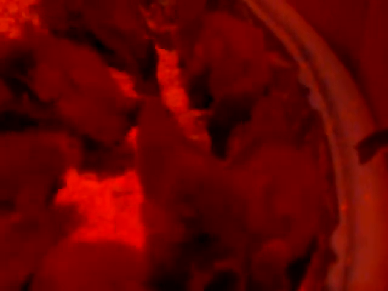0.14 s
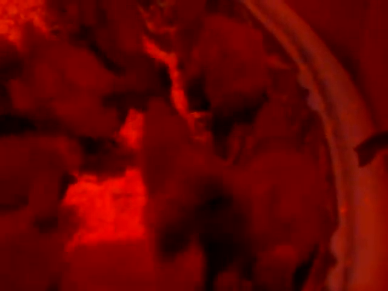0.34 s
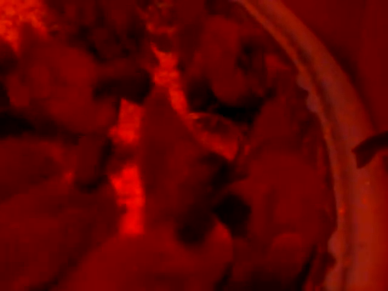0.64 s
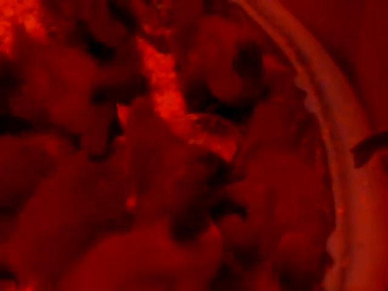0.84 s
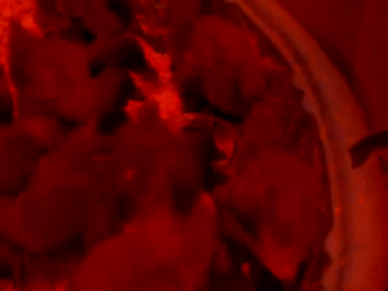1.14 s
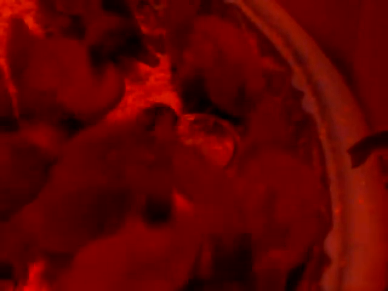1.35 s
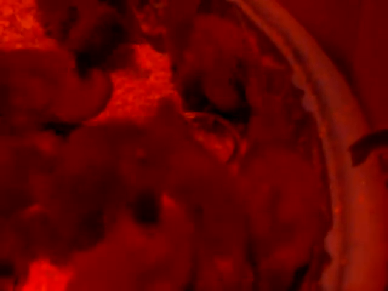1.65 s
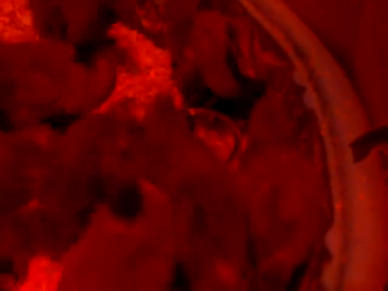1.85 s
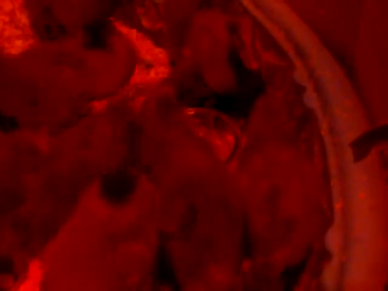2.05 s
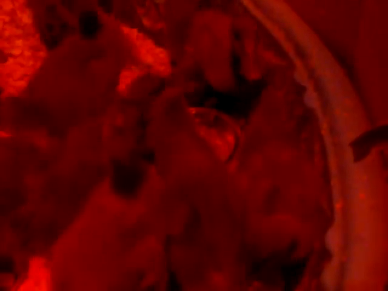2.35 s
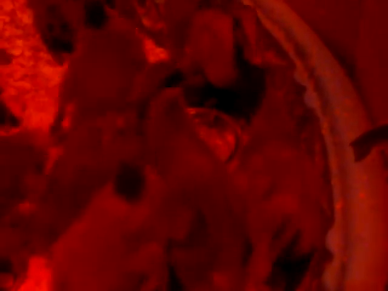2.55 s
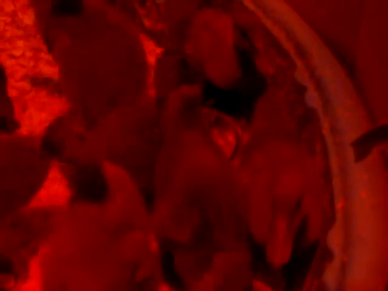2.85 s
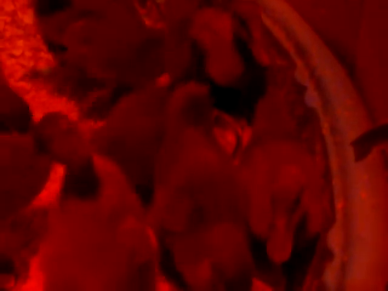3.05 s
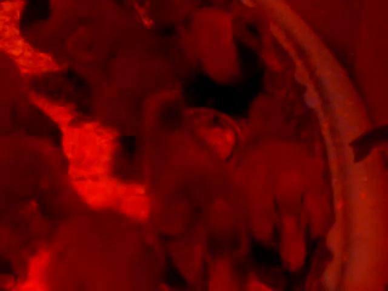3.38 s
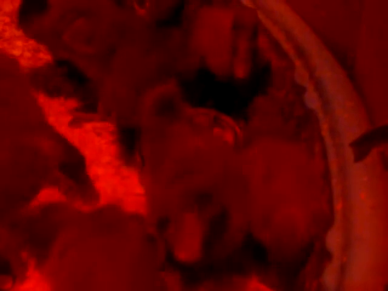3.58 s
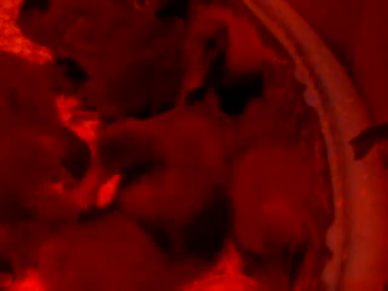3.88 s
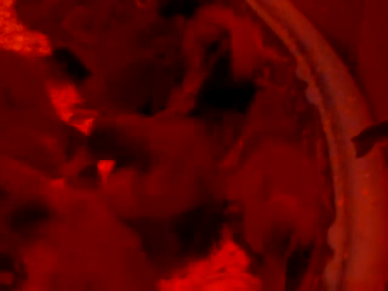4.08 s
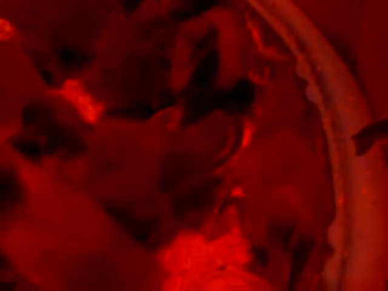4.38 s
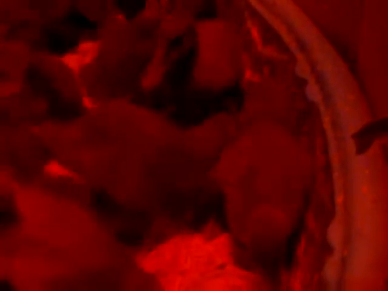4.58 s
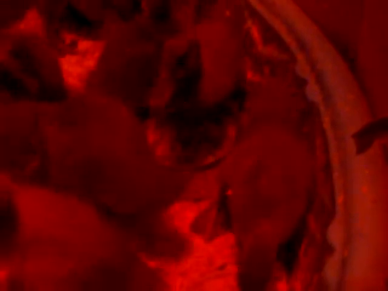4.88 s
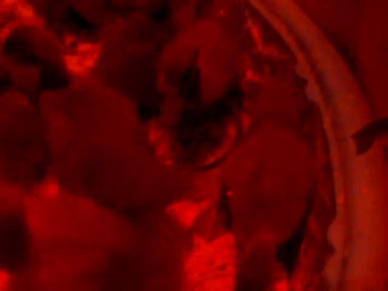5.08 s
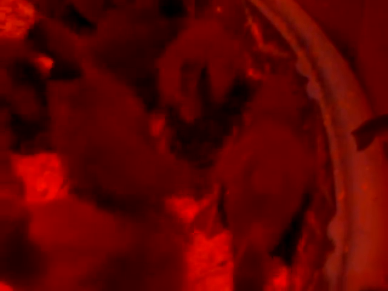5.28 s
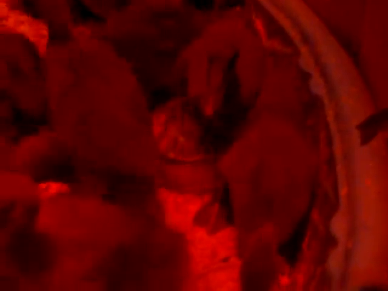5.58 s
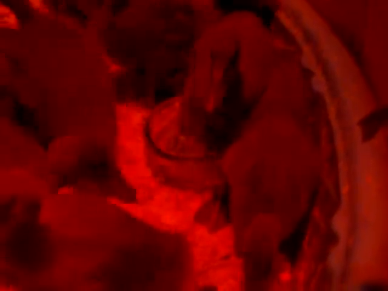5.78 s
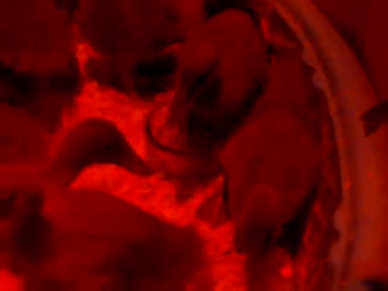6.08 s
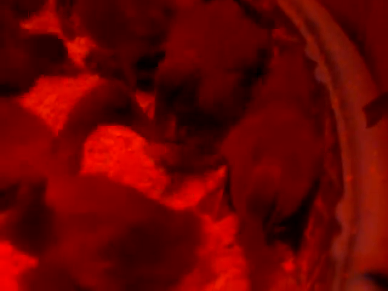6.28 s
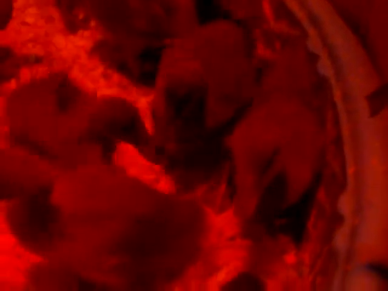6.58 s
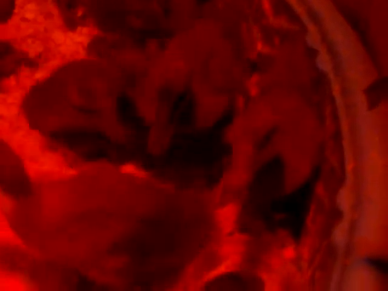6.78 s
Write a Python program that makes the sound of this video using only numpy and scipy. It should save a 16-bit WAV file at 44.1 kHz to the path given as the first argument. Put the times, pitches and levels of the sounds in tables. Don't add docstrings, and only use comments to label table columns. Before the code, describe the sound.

Ducklings feed in a plastic tub indoors, heard very close with short boxy echoes. From 0 to 0.9 seconds, bills snap and crunch quickly over rustling dry bedding and low floor pecks, with a strong wall bump near 0.6. The first peep comes at about 0.9. From 1 to 2.8, crisp clicks, rim clacks, husk cracks and hollow pecking continue, with several short peeps around 1.6 to 2.7, two doubled by thin squeaks. A glass dish pings softly around 2.7 to 3.2. From 3 to 4.5 it is sparser: isolated snaps, scrapes and dull bumps. Brief peeps return from 4.6 to 6.1, while hollow body knocks gather from 5.3 onward. At 6.3 a louder warble leaps up, flips and fades alongside a low dish note, then feet scuffle to the end. Soft low shuffling, airy hiss, faint hum and a barely audible high whine lie beneath.

```python
import sys
import numpy as np
from scipy import signal
from scipy.io import wavfile
from scipy.ndimage import uniform_filter1d

SR = 44100
rng = np.random.default_rng(int(sys.argv[2]) if len(sys.argv) > 2 else 0)


def natural_amplitude(level_db):
    exponent = np.asarray(level_db, float) / 20
    return 10 ** exponent


def transcribe(signal):
    frames = np.atleast_2d(signal).T
    limited = np.clip(frames, -1, 1)
    pcm = np.round(limited * 32767).astype(np.int16)
    wavfile.write(sys.argv[1], SR, pcm)


N = 305613


def evened(x):
    return x / np.sqrt(np.mean(x ** 2) + 1e-20)


def peaked(x):
    return x / (abs(x).max() + 1e-20)


def add(mix, start_s, sound):
    part = mix[round(start_s * SR):][:len(sound)]
    part += sound[:len(part)]


def track(source, events):
    mix = np.zeros(N)
    for start_s, *how in events:
        add(mix, start_s, source(*how))
    return mix


def band(x, lo_hz, hi_hz):
    return signal.sosfilt(signal.butter(2, [lo_hz, min(hi_hz, SR / 2.2)], "bandpass", fs=SR, output="sos"), x)


def coloured(spectrum, patchy_db):
    frames, hz = N // 128 + 5, np.fft.rfftfreq(512, 1 / SR)
    real, imag, patches = rng.standard_normal((frames, 257, 3)).T
    patches = evened(uniform_filter1d(uniform_filter1d(patches, 10, 0), 8, 1))
    point_hz, point_db = np.transpose(spectrum)
    shape_db = np.interp(np.log(hz + 1), np.log(point_hz + 1), point_db)[:, None]
    bins = (real + 1j * imag) * natural_amplitude(shape_db + patchy_db * patches)
    return evened(signal.istft(bins, nperseg=512, noverlap=384)[1][:N])


def burst(t, t60, grit_db):
    grit = natural_amplitude(grit_db * evened(uniform_filter1d(rng.standard_normal(len(t)), 30)))
    first = 0.68 * natural_amplitude(-60 * t / 0.0051)
    return rng.standard_normal(len(t)) * (grit + first) * natural_amplitude(-60 * t / t60) * np.minimum(t / .0002, 1)


def arch(start_s, length_s, top_hz, db, loudest, rest_hz):
    climb_s, climb_share, sag = .027, 0.916, 1.05
    swell_db, swell_share, fade_db, fade_s = 13, .8, 14, .012
    strain_hz, strain_db_per_hz, most_strain_db = 2340, 0.4, 13.5
    t = np.arange(0, length_s, .001)
    loudest_s = loudest * length_s
    top_s, late = min(climb_s, climb_share * loudest_s), t - loudest_s
    bend = np.where(t < top_s, t / top_s, 1 + (t - top_s) / (length_s - top_s))
    hz = rest_hz + (top_hz - rest_hz) * abs(np.sin(np.pi / 2 * bend)) ** sag
    width_s = np.where(late < 0, swell_share * loudest_s, fade_s)
    under_db = np.where(late < 0, swell_db, fade_db) * (1 - np.exp(-(late / width_s) ** 2))
    strain_db = np.clip(strain_db_per_hz * (hz - strain_hz), 0, most_strain_db)
    strain_db *= rest_hz < strain_hz
    return np.transpose([start_s + t, hz, db - under_db - strain_db])


def peep(contour):
    throat_hz, throat_width_hz = 3570, 780
    s, hz, db = np.transpose(contour)
    t = np.arange(s[0], s[-1], 1 / SR)
    tremble = [evened(uniform_filter1d(v, 150))[:len(t)] for v in rng.standard_normal((2, 8000))]
    hz = uniform_filter1d(np.interp(t, s, hz), 250) * (1 + 0.0024 * tremble[0])
    wobble_db = 2.2 * tremble[1]
    phase = 2 * np.pi * np.cumsum(hz) / SR
    throat = 1 / (1 + ((2 * hz - throat_hz) / throat_width_hz) ** 2)
    overtone = natural_amplitude(-22) * (throat + .13) * np.sin(2 * phase)
    tone = np.sin(phase) + overtone + natural_amplitude(-44) * np.sin(3 * phase)
    level = natural_amplitude(uniform_filter1d(np.interp(t, s, db), 150) + wobble_db + 5.0)
    return band(level * tone * signal.windows.tukey(len(t), .15), 700, 12000)


def duckling_voices():
    # start_s, length_s, top_hz, level_db, loudest moment (share of length 0-1)
    peeps = [(0.923, 0.056, 2890, -41, .7), (1.629, .052, 1750, -45.5, 0.46),
             (1.807, 0.058, 2285, -37, 0.37), (2.159, 0.063, 1940, -41, 0.46),
             (2.353, 0.053, 2270, -35.5, 0.39), (2.749, 0.067, 2340, -47.5, 0.8),
             (4.607, 0.044, 2093, -35.5, .36), (4.711, .094, 2254, -38, 0.6),
             (5.097, .06, 1955, -39.5, 0.36), (5.332, 0.032, 1977, -34, 0.31),
             (5.688, 0.043, 1960, -36.5, .45), (6.058, 0.067, 2436, -35.5, 0.66)]
    # start_s, length_s, top_hz, level_db, loudest moment (share 0-1)
    squeaks = [
        (1.818, 0.027, 3530, -45.5, 0.2),
        (2.361, 0.033, 3820, -53, 0.46),
    ]
    # time_s, pitch_hz, level_db
    warble = [
        (6.31, 1686, -44),
        (6.325, 1773, -48),
        (6.345, 2770, -31.5),
        (6.36, 2806, -29.5),
        (6.37, 2740, -38),
        (6.381, 2460, -30),
        (6.395, 2810, -41),
        (6.41, 2400, -49),
        (6.445, 2560, -53),
    ]
    contours = [arch(*row, rest_hz=1459) for row in peeps]
    contours += [arch(*row, rest_hz=3150) for row in squeaks] + [warble]
    return track(peep, [(contour[0][0], contour) for contour in contours])


def snap(db, hz, fizz_db, t60):
    t = np.arange(4000) / SR
    swell = np.minimum(t / (1.2 * t60 ** 2), 1)
    crack = burst(t, max(t60, .008), 4.9) * swell
    ring = peaked(band(crack, hz * 0.877, hz * 1.118))
    wide = peaked(band(crack, 1820, 5060))
    fizz = peaked(band(crack, 8960, 12300))
    return natural_amplitude(db) * peaked(ring + 0.93 * wide) + natural_amplitude(fizz_db + 8.5) * fizz


def bills_and_feet():
    # start_s, peak_db, centre_hz, fizz_db
    clicks = [(.1807, -34, 6600, -50), (.3297, -28.5, 3890, -47), (.38, -67, 7180, -47),
              (.4743, -31.5, 6150, -41.5), (.596, -34.5, 3760, -44.5), (.7974, -24, 3870, -64),
              (.8195, -25, 5300, -44), (.858, -27, 6960, -61), (1.196, -31, 6560, -61),
              (1.2266, -28.5, 3360, -45.5), (1.2467, -35, 4270, -50), (1.412, -37.5, 3660, -48),
              (1.8046, -28, 3870, -36), (2.0363, -33, 3900, -55), (2.0929, -34, 4200, -48.5),
              (2.202, -24.5, 4000, -61), (2.3122, -32.5, 5470, -45), (3.2865, -33, 7600, -66),
              (3.4082, -42, 3560, -66), (3.5049, -46, 3660, -69), (4.626, -38, 4400, -58),
              (4.8634, -36.5, 6260, -43), (4.929, -54, 8000, -70), (5.3103, -28, 3000, -64),
              (5.5338, -44, 3920, -65), (5.608, -31.5, 2830, -66), (5.781, -36.5, 6550, -44),
              (6.0105, -38, 3410, -56), (6.8234, -48, 4160, -70)]
    # start_s, peak_db, centre_hz, fizz_db
    crunches = [(.1074, -31, 6630, -41.5), (.4289, -28, 4070, -65), (.532, -35.5, 4100, -62),
                (.7472, -39, 3870, -49), (1.1677, -37, 4000, -49), (1.736, -53, 4270, -72),
                (1.7505, -28.5, 7800, -66), (1.775, -40, 3800, -51), (1.9783, -26.5, 4300, -42.5),
                (2.075, -42, 3900, -55), (2.1798, -29.5, 4330, -42.5), (2.26, -29.5, 3840, -49),
                (2.5215, -33, 4220, -65), (2.6304, -42.5, 4170, -59), (2.6833, -39.5, 4220, -52),
                (2.7916, -36, 4150, -48.5), (3.3527, -27, 3770, -61), (3.5292, -42, 3650, -59),
                (4.074, -42, 3800, -62), (4.112, -46, 3500, -62), (4.1375, -42, 8430, -47),
                (4.264, -43, 5400, -55), (4.3006, -40, 3950, -47), (4.4304, -42, 6000, -49),
                (5.1983, -37.5, 6700, -53), (5.575, -55, 5470, -68), (5.695, -50, 3840, -53),
                (5.9856, -52, 3090, -51), (6.2721, -40.5, 3670, -47)]
    # start_s, peak_db, centre_hz, fizz_db
    scrapes = [(.0962, -41, 4700, -51), (.671, -31, 3980, -44.5), (1.1139, -37.5, 4900, -47),
               (1.6423, -40, 3550, -69), (2.131, -37, 3840, -47.5), (3.7123, -41.5, 3440, -49),
               (5.3118, -41, 3730, -42.5), (5.594, -33, 3260, -46.5), (5.906, -40, 3770, -42),
               (6.56, -37, 4380, -41), (6.6371, -34.5, 5630, -44.5)]
    # start_s, peak_db, centre_hz, fizz_db, t60_s
    faint = [
        (0.692, -41.5, 2470, -68, 0.14),
        (2.6985, -44, 4430, -55, 0.035),
        (2.827, -35, 2070, -49, 0.041),
        (2.8987, -41, 3000, -68, 0.08),
        (3.103, -45, 1850, -54, 0.075),
        (4.685, -44, 1690, -56, 0.046),
        (6.7338, -41, 1790, -48, 0.091),
    ]
    events = list(faint)
    for table, t60 in ((clicks, 0.021), (crunches, 0.034), (scrapes, 0.05)):
        events += [(*row, t60) for row in table]
    return track(snap, events)


def tap(first_db, second_db, second_hz):
    # pitch_hz, t60_s
    dish = [
        (1903, 0.17),
        (4850, 0.071),
        (8820, 0.41),
    ]
    t = np.arange(8000) / SR
    levels_db = (first_db, second_db, second_db - 15)
    shifts = (1, second_hz / dish[1][0], 1)
    return sum(natural_amplitude(db - 60 * t / t60) * np.sin(2 * np.pi * hz * shift * t)
               for db, (hz, t60), shift in zip(levels_db, dish, shifts))


def dish_taps():
    # start_s, first_mode_db, second_mode_db, second_mode_hz
    taps = [
        (0.5397, -47.5, -39.5, 4770),
        (2.6998, -52, -50, 4770),
        (2.792, -42.5, -43.5, 4840),
        (2.9794, -52.5, -75, 4840),
        (3.119, -58, -57, 4800),
        (3.1903, -52, -73, 4840),
        (4.459, -43.5, -49, 4850),
        (5.2804, -58, -69, 4800),
        (6.2953, -40.5, -68, 4720),
        (6.603, -60, -49.5, 4860),
    ]
    return track(tap, taps)


def knock(db, hz, bright_db, t60):
    # pitch_hz, level_db
    tub = [(250, 24), (330, -30.5), (445, -5.5), (600, -4), (850, -3), (1200, -4), (1600, -63)]
    t = np.arange(7000) / SR
    modes_hz = np.geomspace(280, 1600, num=20) * rng.uniform(1.0, 1.05, 20)
    modes_hz[abs(modes_hz - hz).argmin()] = hz
    wall_hz, wall_db = np.transpose(tub)
    struck_db = 6 * np.exp(-(np.log2(modes_hz / hz) / 0.094) ** 2)
    struck_db -= 13 * np.maximum(np.log2(hz / modes_hz), 0)
    modes_db = np.interp(np.log(modes_hz), np.log(wall_hz), wall_db) + struck_db + 2.5 * rng.standard_normal(20)
    modes_t60 = .09 * (500 / modes_hz) ** .9
    ring = natural_amplitude(modes_db) @ (natural_amplitude(-60 * t / modes_t60[:, None]) * np.sin(2 * np.pi * modes_hz[:, None] * t))
    blows = burst(t, max(t60, .015), 5)
    body = band(band(signal.oaconvolve(ring, blows)[:len(t)], 330, 2330), 248, 2340)
    slap = peaked(band(blows, 1080, 2324))
    return natural_amplitude(db) * (peaked(body) + natural_amplitude(bright_db) * slap)


def tub_knocks():
    # start_s, peak_db, strongest_hz,
    # brightness_db
    bumps = [(0.085, -33, 428, 4.5), (.254, -41.5, 644, 1), (0.29, -28, 930, -11), (.311, -33, 467, -15),
             (0.595, -14.5, 759, -9), (1.896, -40, 436, 5), (2.705, -43.5, 425, 4), (3.711, -39.5, 577, -2),
             (4.0, -45, 463, -4), (4.048, -44.5, 470, -4), (4.073, -40.5, 800, -2.5), (4.394, -37, 590, -7),
             (5.199, -39, 507, -9), (5.312, -22, 804, -1.5), (5.333, -19, 455, -20), (5.593, -18, 1160, -9),
             (5.607, -25, 450, -9), (5.711, -35, 460, -17), (5.778, -27, 467, -27),
             (5.866, -21.5, 586, -19), (5.903, -28.5, 565, -17), (5.983, -18.5, 437, -4.5),
             (6.01, -28.5, 409, -9), (6.048, -33.5, 427, -1.5), (6.131, -35, 565, -36),
             (6.17, -24, 494, -14), (6.219, -23, 431, -29), (6.274, -27.5, 425, -20),
             (6.434, -27, 570, -29)]
    # start_s, peak_db, brightness_db
    clacks = [(.674, -35.5, 0), (0.747, -45.5, 13), (0.764, -48, 9), (.797, -50.5, 20.5),
              (1.127, -50.5, 15.5), (1.147, -45, -1), (1.169, -38, 3.5), (1.229, -35.5, 3.5),
              (1.353, -37, 2.5), (1.394, -31.5, 2.5), (1.78, -41.5, 12), (1.976, -45, 6.5),
              (2.028, -54.5, 21), (2.068, -37.5, 4), (2.199, -50.5, 22.5), (2.243, -40, -2),
              (2.472, -47.5, 9.5), (4.861, -49, 12), (5.439, -42, 0), (5.473, -43.5, 6.5),
              (6.199, -34, -24), (6.464, -29, 1.5), (6.558, -43, 5.5)]
    bump_t60, clack_t60, rim_hz = 0.042, 0.088, 1155
    events = [(*row, bump_t60) for row in bumps]
    events += [(s, db, rim_hz, bright_db, clack_t60) for s, db, bright_db in clacks]
    return track(knock, events)


def peck(db, hz):
    t = np.arange(5000) / SR
    pair = np.sin(2 * np.pi * hz * t) + 0.28 * np.sin(2 * np.pi * (hz * 1.12 * t + rng.random()))
    return natural_amplitude(db - 60 * t / 0.1) * np.minimum(t / 0.0011, 1) * pair


def floor_pecks():
    # start_s, peak_db
    pecks = [(0.034, -42), (.088, -60), (0.209, -44), (.281, -48), (0.46, -46), (.565, -45.5), (.731, -42),
             (1.286, -54), (1.344, -47.5), (1.454, -53), (1.587, -41.5), (1.713, -52), (1.785, -43.5),
             (1.838, -46), (1.896, -57), (1.941, -51.5), (2.004, -51), (2.065, -49), (2.121, -56),
             (2.169, -49.5), (2.224, -50.5), (2.284, -51), (2.712, -49)]
    panel_hz, loaded_hz, loaded_from_s = 446.3, 407, 1.65
    return track(peck, [(s, db, panel_hz if s < loaded_from_s else loaded_hz) for s, db in pecks])


def thud(db):
    t = np.arange(8000) / SR
    return natural_amplitude(db) * peaked(band(burst(t, 0.12, 2.5) * np.minimum(t / 0.013, 1), 100, 246))


def step_thuds():
    # start_s, peak_db
    steps = [
        (0.278, -62),
        (3.121, -66),
        (3.712, -60),
        (3.994, -60),
        (4.062, -58),
        (4.388, -56),
        (5.601, -55),
        (6.425, -60),
    ]
    return track(thud, steps)


def husk(db):
    return natural_amplitude(db) * peaked(band(burst(np.arange(2000) / SR, 0.052, 1.3), 6630, 0.925 * 12300))


def husk_cracks():
    # start_s, peak_db
    husks = [(0.0514, -35.5), (0.227, -40), (0.6385, -36), (0.691, -32), (1.286, -40), (1.298, -39),
             (1.3483, -42), (1.4217, -38), (1.6881, -45), (2.235, -33.5), (2.3446, -36), (2.5697, -39),
             (4.863, -44), (6.0433, -39), (6.4776, -36.5), (6.4953, -39), (6.733, -36), (6.749, -48)]
    return track(husk, husks)


def rustle():
    # time_s, level_db
    activity = [
        (0.0, -51.5),
        (0.81, -54),
        (0.98, -53.5),
        (2.31, -53),
        (2.59, -55),
        (4.86, -56),
        (6.31, -51),
        (6.93, -54),
    ]
    # pitch_hz, level_db per Hz
    bedding = [(88, -68), (150, -58), (424, -21), (706, -4.5), (1250, -1.5), (2960, -10.5), (10200, -11),
               (14200, -23.5), (16300, -53)]
    cracks = natural_amplitude(2.0 * np.minimum(rng.exponential(1, N), 3.5)) * (rng.random(N) < 400 / SR)
    puffs = evened(signal.oaconvolve(cracks, natural_amplitude(-60 * np.arange(2000) / SR / 0.1))[:N])
    ticks, colour = cracks * (rng.random(N) < .3), rng.integers(0, 5, N)
    grain = burst(np.arange(600) / SR, .012, 5)
    fine = np.zeros(N)
    for k, hz in enumerate([1180, 1800, 3000, 4300, 6150]):
        ticking = signal.oaconvolve(ticks * (colour == k), grain)[:N]
        fine += band(ticking, hz, 1.8 * hz) / np.sqrt(hz)
    s, db = np.transpose(activity)
    shavings = evened(coloured(bedding, 2.5) * (.2 + puffs))
    return natural_amplitude(np.interp(np.arange(N) / SR, s, db) - 2) * (shavings + natural_amplitude(-4.5) * evened(fine))


def rumble():
    lumps = natural_amplitude(3.5 * evened(uniform_filter1d(rng.standard_normal(N), 3500)))
    return natural_amplitude(-83.5) * lumps * evened(band(rng.standard_normal(N), 74, 370))


def hum():
    # time_s, pitch_hz, level_db
    drift = [
        (0, 107.2, -101),
        (.8, 110, -83),
        (1.0, 116, -81),
        (1.8, 118, -81),
        (2, 100.7, -84),
        (6.93, 100, -94),
    ]
    t, (s, hz, db) = np.arange(N) / SR, np.transpose(drift)
    drone = natural_amplitude(np.interp(t, s, db)) * np.sin(2 * np.pi * np.cumsum(np.interp(t, s, hz)) / SR)
    waver = natural_amplitude(1.5 * evened(uniform_filter1d(rng.standard_normal(N), 6000)))
    return drone + waver * natural_amplitude(-74) * np.sin(2 * np.pi * 248 * t)


def room_air():
    # pitch_hz, level_db per Hz
    air = [(24, -52), (40, -38), (168, -51), (251, -4), (357, 3), (605, 6), (1500, -7), (2800, -9),
           (7290, -31), (7860, -8), (9860, -9.5), (14400, -10.5), (16300, -42)]
    return natural_amplitude(-58.5 - 3.0) * coloured(air, 2.0)


def room(x, t60):
    echoes, at = np.zeros(SR // 2), np.arange(100, SR // 2 - 20, 20)
    echoes[at + rng.integers(0, 20, len(at))] = rng.choice([-1., 1.], len(at))
    echoes *= natural_amplitude(-60 * np.arange(len(echoes)) / SR / t60)
    return signal.oaconvolve(x, echoes / np.linalg.norm(echoes))[:N]


def scene():
    voices = duckling_voices()
    hits = bills_and_feet() + dish_taps() + tub_knocks() + floor_pecks() + step_thuds() + husk_cracks()
    wet = natural_amplitude(-8.5) * room(voices, 0.15) + natural_amplitude(-9.5) * room(hits, 0.17)
    background = rustle() + rumble() + hum() + room_air()
    return (voices + hits + wet + background)[None]


def low_pass(x):
    return signal.sosfilt(signal.butter(12, 16450, fs=SR, output="sos"), x)


def record(dry):
    whine_hz, edge_hz = 7867, 15300
    notched = dry
    for sharpness in (22, 40):
        notched = signal.lfilter(*signal.iirnotch(whine_hz - 12, sharpness, SR), notched)
    whine = natural_amplitude(-83) * np.sin(2 * np.pi * whine_hz * np.arange(N) / SR)
    below = signal.oaconvolve(notched, signal.firwin(511, edge_hz, fs=SR)[None], "same")
    mix = below + natural_amplitude(-34) * (notched - below) + whine
    return low_pass(mix)


dry = scene()
out = record(dry)
transcribe(out)
```